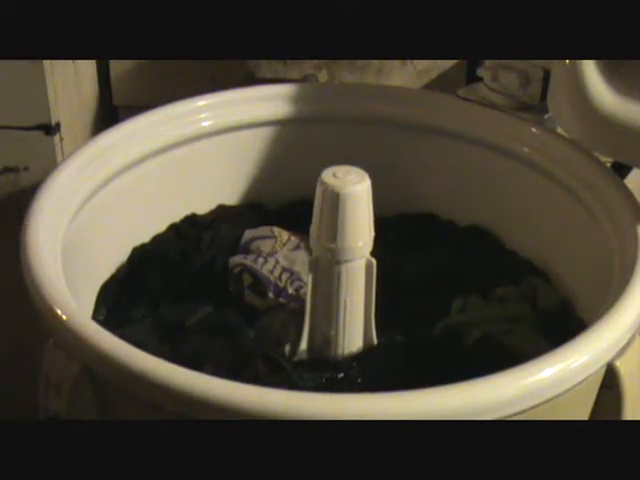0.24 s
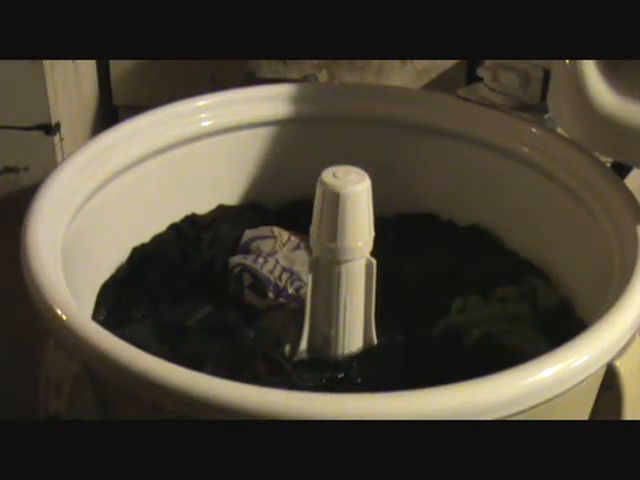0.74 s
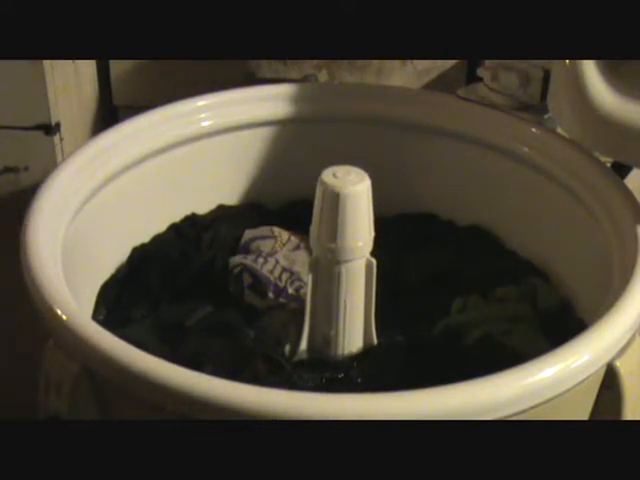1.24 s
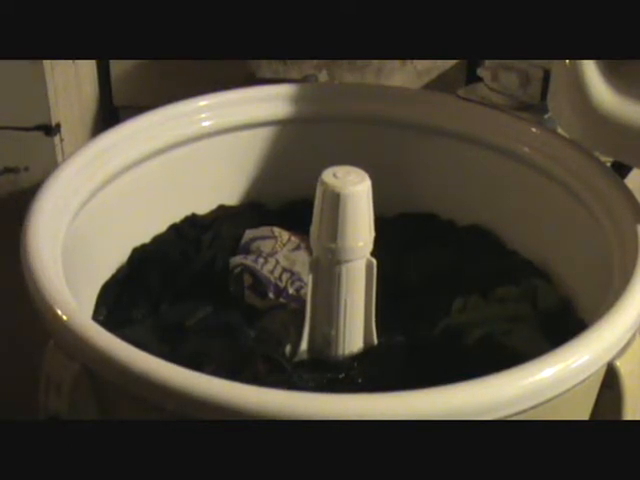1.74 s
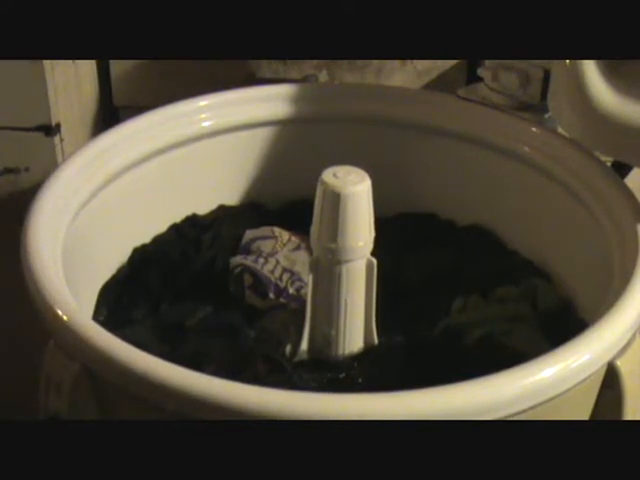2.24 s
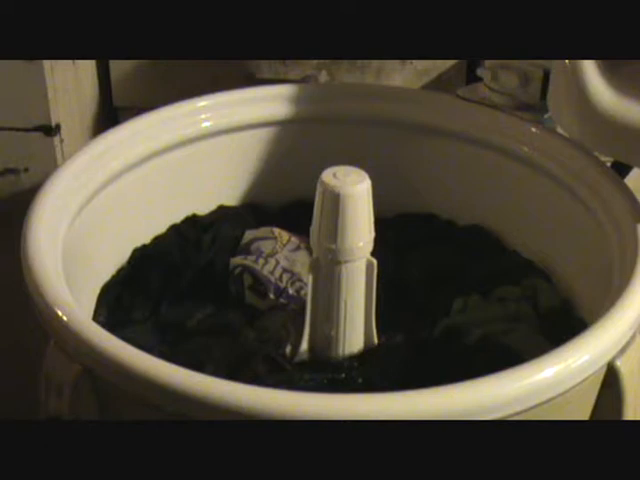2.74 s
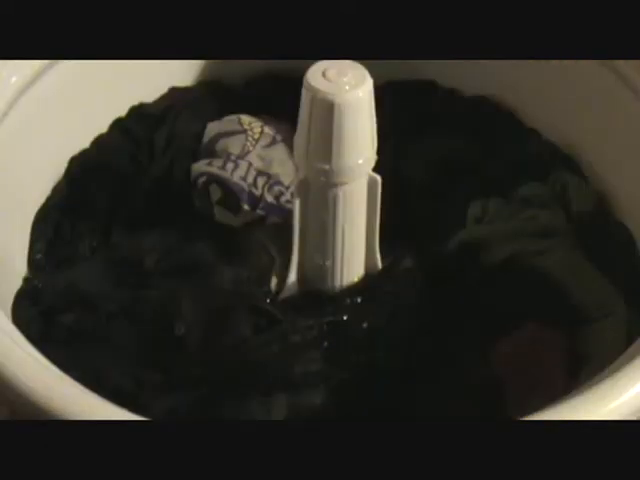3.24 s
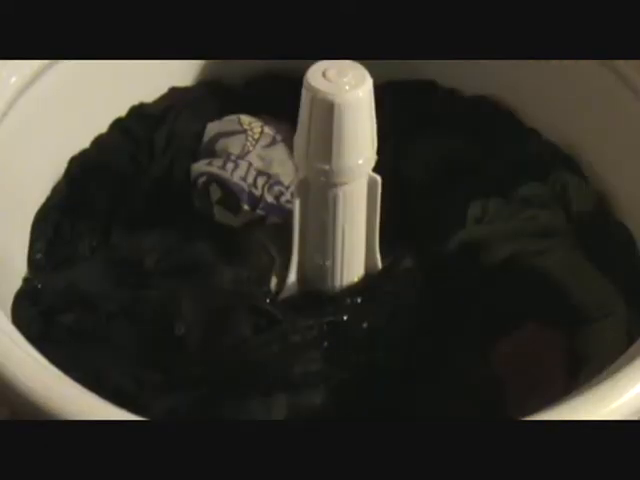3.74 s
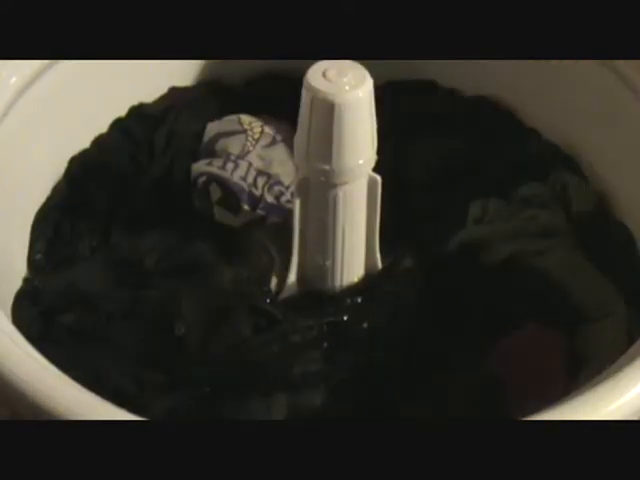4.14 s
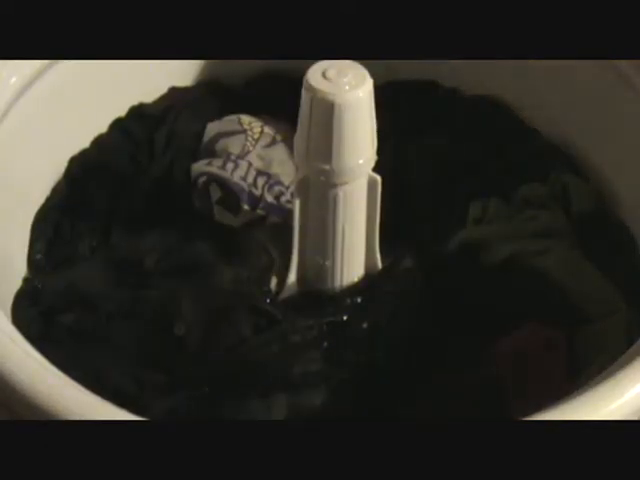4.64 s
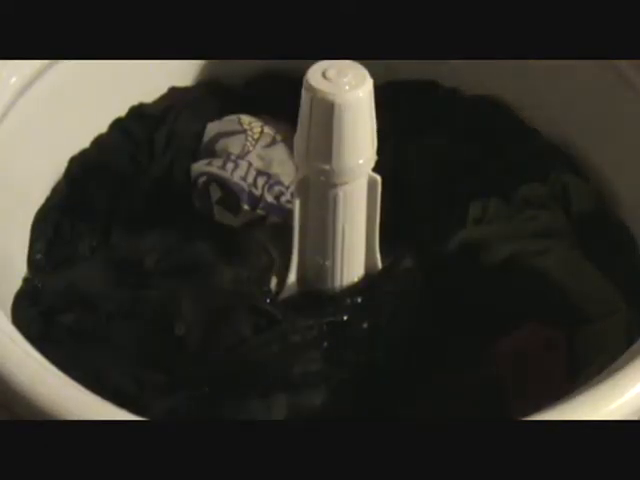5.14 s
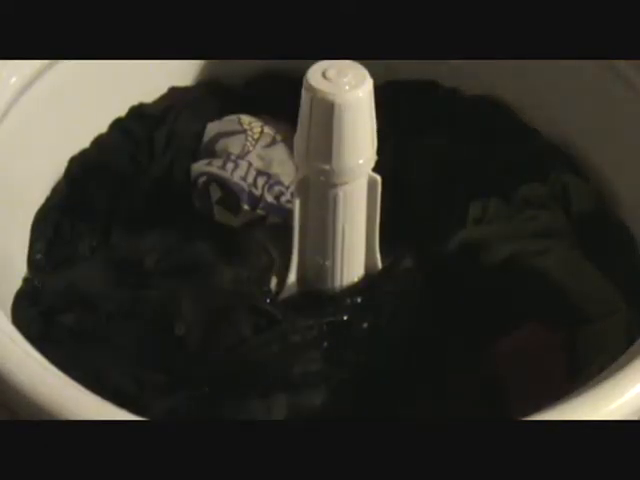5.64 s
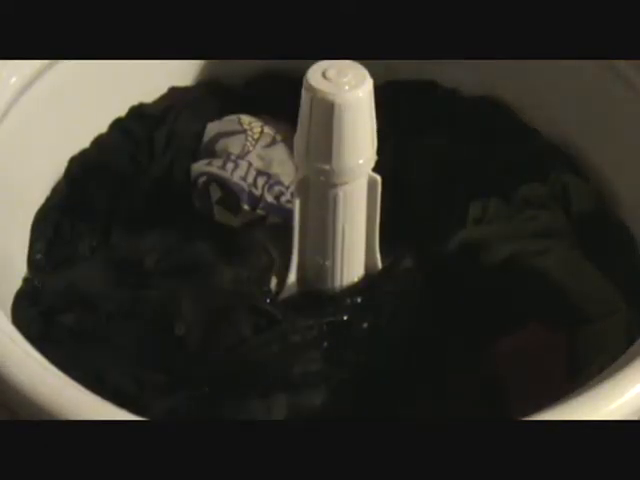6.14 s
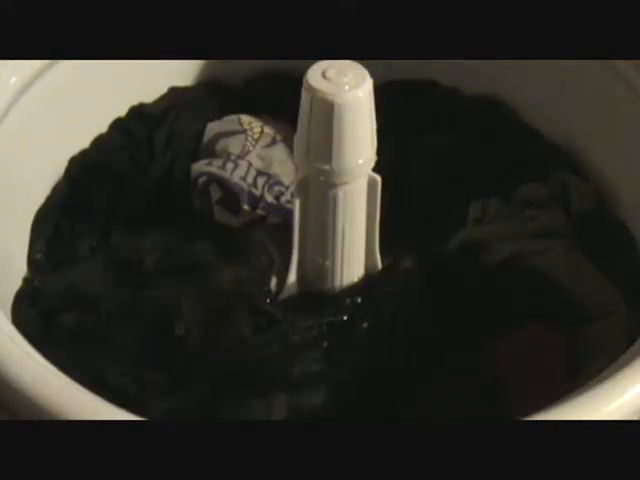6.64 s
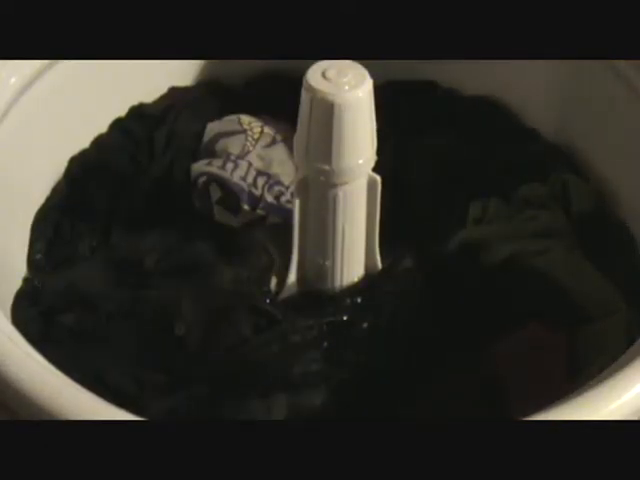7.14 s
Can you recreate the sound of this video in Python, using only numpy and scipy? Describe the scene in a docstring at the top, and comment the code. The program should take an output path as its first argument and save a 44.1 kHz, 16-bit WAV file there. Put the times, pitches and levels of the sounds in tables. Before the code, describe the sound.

Water pours steadily into a clothes-filled washer tub, drumming and gurgling, then cuts closer and hissier, with knob rattles and a stronger spray.

```python
"""Water sprays onto clothes in a top-loading washer: dense random droplets hiss, heavy lumps ring the tub's modes.
Heard first from beside the machine, where the drumming weakens and its deep gurgle sags as the water deepens.
At about 3.1 s the sound fades out briefly and returns from closer by, over the tub, with more hiss than drumming.
Short rattles of a control knob and the cabinet ring a metal panel; then the inlet opens wider and the spray grows.
Soft bumps of a hand on the camera body and a faint cabinet drone, both coloured noise, lie underneath."""
import sys
import numpy as np
from scipy import signal
from scipy.fft import rfft, irfft
from scipy.io import wavfile

SR = 44100
rng = np.random.default_rng(int(sys.argv[2]) if len(sys.argv) > 2 else 0)


def log_audio(samples):
    """Write samples as a 16-bit WAV file to the path given in sys.argv[1]."""
    # one column per channel
    frames = np.atleast_2d(samples).T
    # limit to full scale, then quantise
    limited = np.clip(frames, -1, 1)
    pcm = np.round(limited * 32767).astype(np.int16)
    wavfile.write(sys.argv[1], SR, pcm)


N = 326340
T, HZ = np.arange(N) / SR, np.fft.rfftfreq(N, 1 / SR)
MOVE_S = 3.105  # the listening position goes from beside the machine to over the tub
# Tub resonances, low group and high group; levels are relative within a group, widths are nominal:
# f/Hz, width/Hz, level from afar/dB, level close by/dB
DEEP_MODES = [(150.5, 14.5, -15.5, -4.5), (170.2, 8.1, -3.5, 0), (190, 22, -23, -1),
              (225.7, 14.7, -9, -0.5), (242.4, 13.8, -6, -8), (263, 13.6, -3, 0.5), (289.6, 5.7, -3.5, -8),
              (330.5, 24, -1.5, -8.5), (367, 11, -11, -12)]
UPPER_MODES = [(390, 8.9, -3.5, -14), (443.2, 14, -3, -3), (469.2, 18, 1, 1), (527.3, 23, 1, -25),
               (554.3, 34, 6.5, -5.5), (614.5, 20, -5, -27), (656, 16.4, 3.5, -23), (707, 29, -28, 1),
               (788, 20, -18, -10), (852, 12, -16, -4), (1522, 16, 2.5, 1)]


def gain_of(db):
    """Decibels to amplitude."""
    return 10 ** (np.asarray(db) / 20)


def evened(x):
    """Scales to rms 1."""
    return x / np.sqrt(np.mean(x ** 2) + 1e-20)


def curve(rows, axis=1):
    """One column of a time table, interpolated at every sample."""
    rows = np.array(rows)
    return np.interp(T, rows[:, 0], rows[:, axis])


def read(points):
    """A frequency table, interpolated on a logarithmic axis."""
    hz, value = np.transpose(points)
    return np.interp(np.log(HZ + 1), np.log(hz + 1), value)


def drift(rate_hz):
    """Slow random motion of rms 1: noise that fades out above about rate_hz."""
    return evened(irfft(rfft(rng.standard_normal(N)) * np.exp(-(HZ / rate_hz) ** 2), N))


def swell(s, half_s):
    """A smooth rise and fall of height 1 around time s."""
    return np.exp(-((T - s) / half_s) ** 2)


def noise():
    """Two unrelated white noises."""
    return rng.standard_normal((2, N))


def colour(x, response):
    """Filters by a frequency response, to rms 1."""
    return evened(irfft(rfft(x) * response, N))


def resonance(hz, width_hz):
    """Response of one damped mode, with the same energy whatever its width."""
    return 1j * HZ * np.sqrt(abs(width_hz)) / (hz ** 2 - HZ ** 2 + 1j * HZ * width_hz)


def ringing(modes):
    """Response of many modes, each a doubled resonance so that the valleys between them stay dark."""
    total = 0
    for hz, width, db in modes:
        # each of the two is wider, as doubling narrows the peak
        total = total + gain_of(db) * np.sqrt(abs(width)) * resonance(hz, 1.38 * width) ** 2
    return total


def drops(per_s, spread_db):
    """Random impacts, mostly small; the second row is white noise for their diffuse scatter."""
    size = gain_of(spread_db * np.minimum(rng.exponential(1, N), 4)) * rng.choice([-1, 1], N)
    landed = rng.random(N) < per_s / SR
    return np.array([evened(size * landed), rng.standard_normal(N)])


def tub_echoes(x, decay_s, wet):
    """The round wall throws each splash back within milliseconds, along paths that shift with the jet."""
    # about 3000 echoes a second, none sooner than 2 ms
    taps = noise() * (rng.random((2, N)) < 3000 / SR) * np.exp(-T / decay_s) * (T > .002)
    first, second = (irfft(rfft(x) * rfft(path / np.linalg.norm(path)), N) for path in taps)
    sway = 0.58 * drift(2.9)  # radians, turns one set of paths into the other
    return evened(x + wet * (np.cos(sway) * first + np.sin(sway) * second))


def spurts(per_s, decay_s):
    """Slaps of the breaking jet that start at once and die away: mean 0, rms 1."""
    starts = rng.exponential(1, N) * (rng.random(N) < per_s / SR)
    level = signal.lfilter([1], [1, -np.exp(-1 / (decay_s * SR))], starts)
    return evened(level - level.mean())


def spray(spectrum, flow_db, spread_db, spurt_db, patch_db):
    """Thousands of droplets a second; the jet spurts as a whole and each of six bands comes in flurries."""
    impacts = tub_echoes(drops(per_s=14000, spread_db=spread_db), decay_s=0.017, wet=0.32)
    shape = gain_of(read(spectrum))
    # the flow level refers to the part above 2.5 kHz
    splash = rfft(impacts) * shape / np.sqrt(np.mean(shape ** 2 * (HZ > 2500)))
    band = np.interp(np.log(HZ + 1), np.log([700, 1500, 3000, 5000, 8000, 12000]), np.arange(6))
    flurries = 0
    for k in range(6):
        share = np.maximum(1 - abs(band - k), 0)  # overlapping triangles
        flurries = flurries + irfft(splash * share, N) * gain_of(patch_db * drift(38))
    return flurries * gain_of(flow_db + spurt_db * spurts(per_s=70, decay_s=0.012))


def lumps(throb_db):
    """Heavy lumps of the stream, arriving in uneven surges."""
    return drops(per_s=540, spread_db=3.5) * gain_of(throb_db * drift(42))


def resonate(x, hz, width_hz):
    """A resonance that follows the pitch curve hz: shifts it to 0 Hz, smooths, shifts back."""
    turn = np.exp(2j * np.pi * np.cumsum(hz) / SR)
    r = np.exp(-np.pi * abs(width_hz) / SR)
    return evened((turn * signal.lfilter([1 - r], [1, -r], x / turn)).real)


def gurgle(pitch_hz, width_hz, waver, splat_db):
    """Lumps ring the wavering air pocket under the stream; the same blows also strike the tub directly."""
    blows = lumps(throb_db=1.0)
    pocket = resonate(blows, pitch_hz * (1 + waver * drift(8.4)), width_hz)
    return pocket + gain_of(splat_db) * blows


def slugs():
    """Decibels that heavy slugs of water hitting the tub add to the deep and to the upper modes."""
    # t/s, added level of deep modes/dB, added level of upper modes/dB
    slug_hits = [(0.33, 5.5, 8), (0.83, 5, 2.5), (1.14, 4, 4), (1.87, 1, 3), (3.62, 4, 0), (3.75, 7, 2),
                 (4.47, 7, 5), (6.21, 4.5, 5.5), (6.6, 4, 0.5), (6.76, 2, 0)]
    half_s = 0.029
    return sum(np.outer([deep_db, upper_db], swell(s, half_s)) for s, deep_db, upper_db in slug_hits)


def drumming(drive, modes, column, force_db):
    """A group of tub modes kept ringing by the water; column picks the listening position."""
    heard = [(row[0], row[1], row[column]) for row in modes]
    return colour(drive, ringing(heard)) * gain_of(force_db)


def far_water():
    """Spray and a strongly drumming tub from beside the machine; shallow water lets the deep modes boom."""
    # centre pitches of the gurgle: the deep one sags, the upper one rises at first and then sags:
    # t/s, deep f/Hz, upper f/Hz
    gurgle_pitch = [(0, 277.5, 527), (.6, 257, 590), (1.2, 237, 567), (2, 240, 548), (3, 232, 519)]
    # relative colour of the spray: f/Hz, density level/dB
    far_colour = [(60, -29), (200, -10.5), (500, -7.5), (850, -8.5), (1300, -4.5), (2000, -3.5),
                  (2700, -4.5), (4400, -3), (5200, -3), (6500, -0.5), (8700, -2), (10700, -4), (13000, -10),
                  (15700, -15.5)]
    deep = gurgle(curve(gurgle_pitch, axis=1), width_hz=13.4, waver=0.0072, splat_db=15.0)
    upper = gurgle(curve(gurgle_pitch, axis=2), width_hz=44, waver=0.024, splat_db=20)
    deep_slugs, upper_slugs = slugs()
    shallow_db, cushion_s = 9.5, 0.95  # extra boom at the start, and the time constant of its loss
    deep_db = -41.5 + shallow_db * np.exp(-T / cushion_s)
    upper_db = -33.5 - 0.52 * T  # the upper modes lose little: 0.52 dB a second
    tub = drumming(deep, DEEP_MODES, 2, deep_db + deep_slugs)
    tub += drumming(upper, UPPER_MODES, 2, upper_db + upper_slugs)
    flow_db = -23 - 0.09 * T  # softens as the water deepens
    return tub, spray(far_colour, flow_db, spread_db=1.1, spurt_db=0.28, patch_db=0.46)


def rumble(drone_hz):
    """Handling of the camera body as low noise with soft bumps, and the faint drone of the cabinet."""
    # relative colour of the handling: f/Hz, density level/dB
    handling_colour = [(8, -18), (20, 0), (38, -5), (60, -7.5), (90, -17), (200, -20), (600, -70)]
    # soft bumps of the hand: t/s, level/dB, time to fall 60 dB/s
    hand_bumps = [(0.05, -43, 0.47), (0.26, -46, 0.7), (1.11, -47, 0.8), (1.35, -47, 0.7), (1.92, -52, 1.0),
                  (2.73, -46, 0.7), (3.59, -41, 0.5), (3.83, -50, 0.25), (3.986, -38, 0.59),
                  (4.305, -41.5, 0.5), (4.46, -48, 0.3), (5.58, -39, 0.22)]
    rise_s = 0.012
    power = gain_of(-55 - 1.5 * T) ** 2  # the grip calms as the hand steadies
    for s, db, decay_s in hand_bumps:
        age = np.maximum(T - s, 0)
        power += (np.minimum(age / rise_s, 1) * gain_of(db - 60 * age / decay_s)) ** 2
    handling = colour(noise(), gain_of(read(handling_colour))) * np.sqrt(power)
    drone_db = np.where(T < MOVE_S, -59, -65) + 8.5 * swell(2.85, 0.11)  # swells once
    return handling + colour(noise(), ringing([(drone_hz, 11, 0)])) * gain_of(drone_db)


def near_water():
    """Over the tub the hiss leads; the wider inlet adds a stronger spray, hollow rings and harder drumming."""
    # relative colours of the spray before and after the inlet opens wider: f/Hz, density level/dB
    gentle_colour = [(60, -20), (110, -18.5), (170, -14.5), (350, -11), (600, -10), (800, -11), (1150, -7),
                     (1400, -7.5), (1800, -9), (2500, -7), (3800, -2.5), (5500, -1), (7600, 0.75),
                     (10700, -1.5), (13000, -7.5), (15700, -13.5)]
    full_colour = [(100, -22), (300, -15), (850, -15), (1150, -8), (1700, -11), (2300, -9.5), (2950, -3),
                   (4400, -1.5), (6000, 1.2), (7500, -1), (8700, 0), (10500, -3), (13000, -8),
                   (15700, -14.5)]
    # hollow rings of the splash under full flow: f/Hz, width/Hz, level at the opening/dB, loss/(dB/s)
    splash_rings = [(1425, 58, -39.5, 7.5), (3019, 220, -42, 4), (4410, 127, -42, -4),
                    (7520, 350, -30.5, 0)]
    open_s = 5.532  # the inlet opens wider
    since_move, age = np.maximum(T - MOVE_S, 0), np.maximum(T - open_s, 0)
    opened = np.clip((T - open_s) / 0.013 + .5, 0, 1)
    # the drumming slackens by 8.5 dB over the 0.54 s before the opening
    slack = -8.5 * np.clip(1 + (T - open_s) / 0.54, 0, 1)
    build = -11 * np.exp(-age / 0.32)  # dB, the upper modes start lower and build up
    deep_db = (1 - opened) * (-50.5 + slack) + opened * -42
    upper_db = (1 - opened) * (-49.5 + slack) + opened * (-42 + build)
    deep_slugs, upper_slugs = slugs()
    tub = drumming(lumps(throb_db=2.2), DEEP_MODES, -1, deep_db + deep_slugs)
    tub += drumming(lumps(throb_db=0.5), UPPER_MODES, -1, upper_db + upper_slugs)

    gentle_db = -24.5 - 2 * np.exp(-since_move / 0.68)  # starts a little low and settles
    gentle = spray(gentle_colour, gentle_db, spread_db=2.0, spurt_db=0.25, patch_db=0.5)
    sputter_s, half_s = 7.09, 0.061  # once the jet surges and then sags, by 1 dB
    sputter_db = swell(sputter_s - half_s, half_s) - swell(sputter_s + half_s, half_s)
    full = spray(full_colour, -21 + sputter_db, spread_db=2.0, spurt_db=0.45, patch_db=0.62)
    for hz, width, db, loss_db in splash_rings:
        full += colour(noise(), resonance(hz, width)) * gain_of(db - loss_db * age)
    return tub, (1 - opened) * gentle + opened * full


def knocks():
    """Each knob or cabinet knock is a short noise rattle that rings the modes of a sheet-metal panel."""
    # t/s, level before doubling/dB, time to fall 60 dB/s, treble tilt/(dB/octave)
    knock_list = [(3.578, -43, 0.18, -6), (3.971, -35, 0.12, -2), (4.545, -34.5, 0.18, -1),
                  (4.568, -27, 0.17, -0.5), (4.699, -30, 0.085, 2), (4.716, -34, 0.081, -4),
                  (4.985, -39.5, 0.29, 0.5)]
    # panel modes: f/Hz, width/Hz, relative level/dB
    panel_modes = [(162, 30, -19), (290, 55, -13), (473, 22, 0.5), (600, 120, -6), (675, 41, 2),
                   (1140, 290, -0.5), (1390, 97, -3), (1653, 34, 2.5), (1970, 140, -0.5), (2310, 80, -1.5),
                   (2900, 79, -4), (3585, 220, -6)]
    out = np.zeros((2, N))
    panel = 0
    for k, (hz, width, db) in enumerate(panel_modes):
        panel = panel + (-1) ** k * gain_of(db) * resonance(hz, width)  # neighbours in opposite phase
    octaves = np.log2(np.clip(HZ, 200, 2500) / 1000)
    for s, db, decay_s, tilt_db in knock_list:
        age = np.maximum(T - s, 0)
        force = noise() * (1 - np.exp(-age / 0.0023)) * gain_of(-60 * age / decay_s)
        body = panel * gain_of(tilt_db * octaves)
        body = body / np.sqrt(np.mean(abs(body) ** 2))
        out += 2 * gain_of(db) * irfft(rfft(force) * body, N)
    return out


def microphones(x, likeness, lead):
    """Two close ports share the direct sound, shifted in phase, and differ by the diffuse part."""
    # left over right: f/Hz, level/dB
    balance = [(40, -0.5), (130, 0), (270, 1.5), (550, 3.5), (1000, 4.2), (2000, 0.8), (3200, 0), (5400, 3),
               (8500, 1.5), (13000, 2.5)]
    direct, diffuse = rfft(x)
    same = np.clip(read(likeness), 0, 1)
    common = direct * np.sqrt((1 + same) / 2)
    apart = diffuse * np.sqrt((1 - same) / 2)
    lean = gain_of(read(balance) / 2) * np.exp(.5j * read(lead))  # half to each side
    ports = np.array([(common + apart) * lean, (common - apart) / lean])
    return irfft(ports / abs((lean + 1 / lean) / 2), N)


def scene():
    """Water from two positions, with knocks and rumble, on a microphone pair."""
    # likeness of the two ports for the tub, higher at low and middle frequencies, and for the spray:
    # f/Hz, likeness/(0 to 1)
    tub_likeness = [(30, .96), (90, .88), (170, .97), (600, .975), (1500, .9)]
    spray_likeness = [(100, .7), (800, .74), (1200, .85), (1700, .8), (2300, .94), (3000, .95), (4800, .8),
                      (8500, .83), (13000, .75), (15500, .85)]
    # phase by which the left port leads, beside the machine and over the tub: f/Hz, phase/rad
    far_lead = [(30, .1), (100, .7), (180, 1.2), (350, 1.35), (550, 1.15), (800, 1.1), (1120, .5),
                (2500, .1), (6300, .22), (11800, .45), (15500, .05)]
    near_lead = [(30, .05), (100, .3), (180, .65), (400, .9), (780, .85), (1120, .45), (2600, .03),
                 (5000, .28), (8500, .25), (11800, .48), (15500, .05)]
    cabinet = knocks() + rumble(drone_hz=103.0)
    positions = []
    for water, lead in [(far_water, far_lead), (near_water, near_lead)]:
        tub, hiss = water()
        solid = microphones(tub + cabinet, tub_likeness, lead)
        positions.append(solid + microphones(hiss, spray_likeness, lead))
    far, near = positions
    return np.where(T < MOVE_S, far, near)


def record(dry):
    """The brief fade between positions, then a steep lowpass at 15.8 kHz."""
    # t/s, gain/(0 to 1)
    fade = [(0, 1), (3.058, 0.98), (3.074, 0.07), (3.095, 0.0027), (3.119, 0), (3.135, 0.74), (3.16, 1)]
    lowpass = signal.firwin(601, 15800, window=("kaiser", 9), fs=SR)
    return signal.oaconvolve(dry * curve(fade), lowpass[None], "same")


dry = scene()
out = record(dry)
log_audio(out)
```